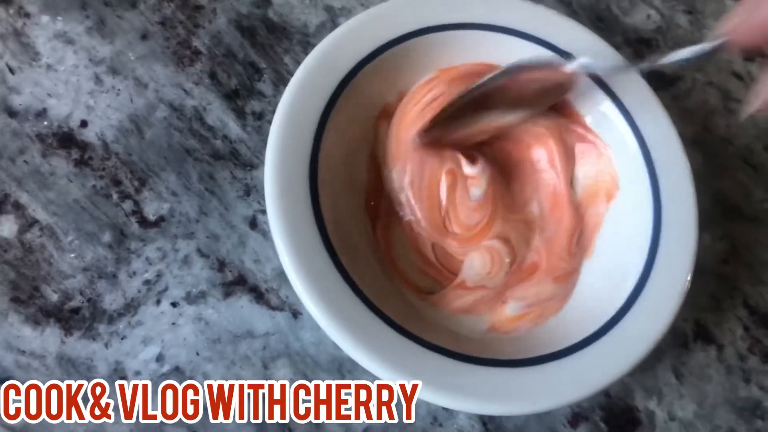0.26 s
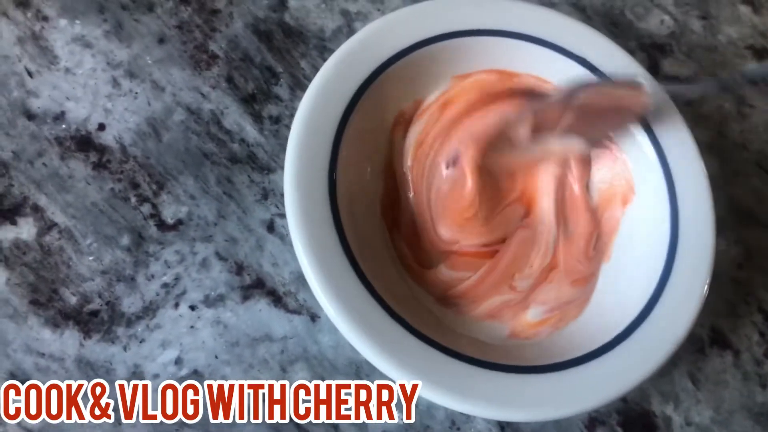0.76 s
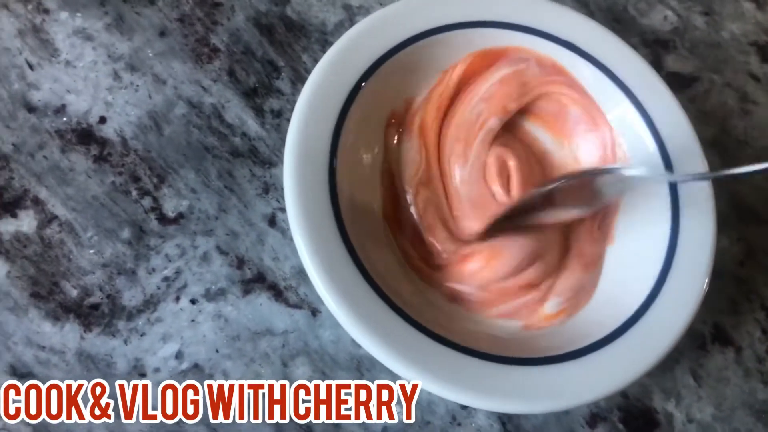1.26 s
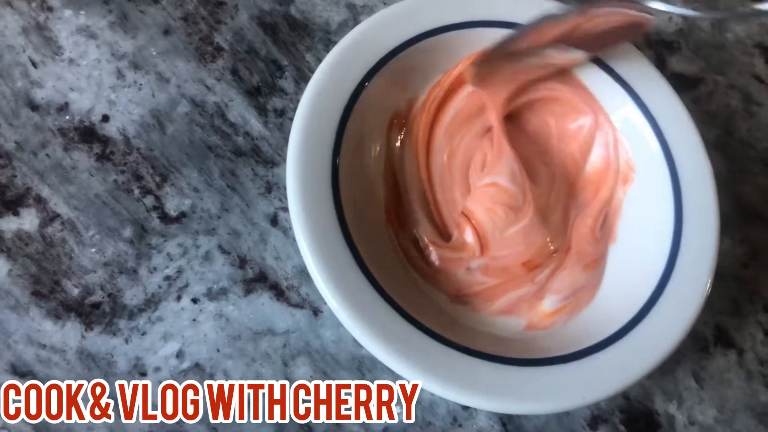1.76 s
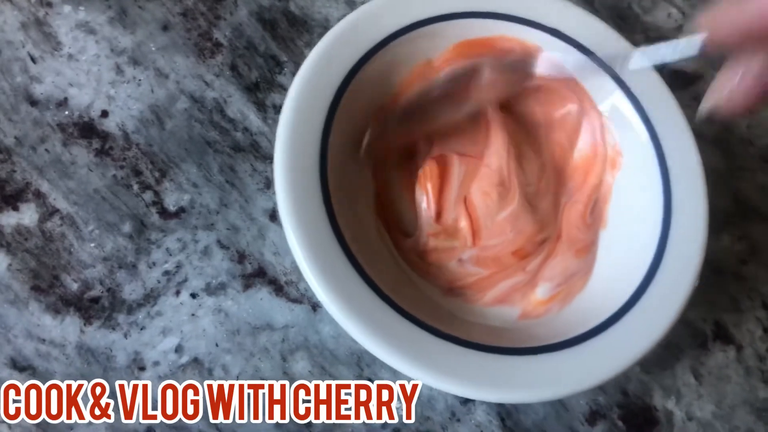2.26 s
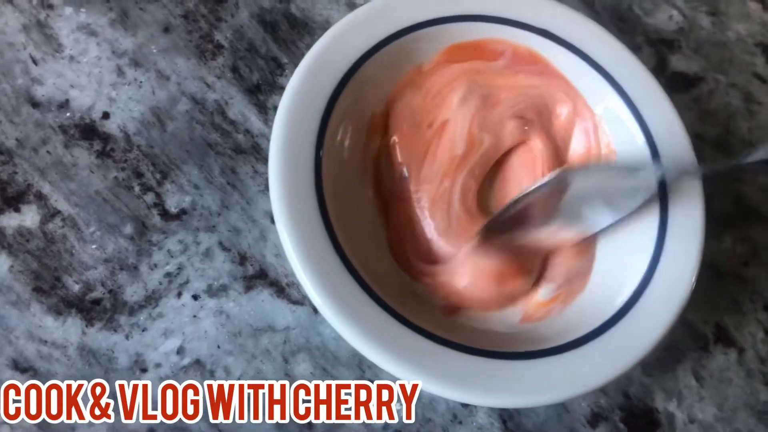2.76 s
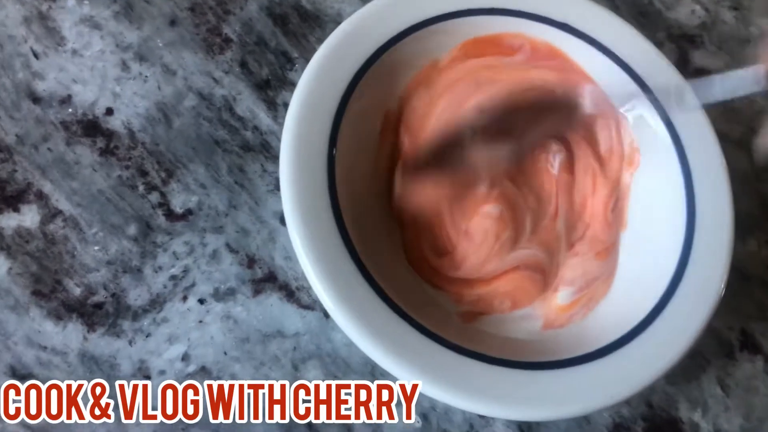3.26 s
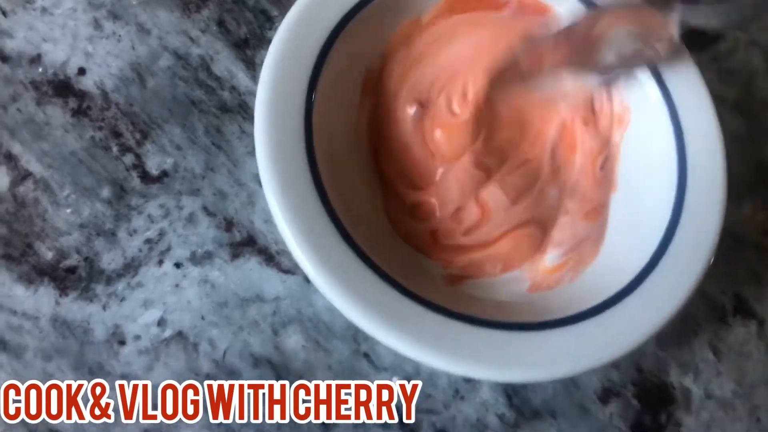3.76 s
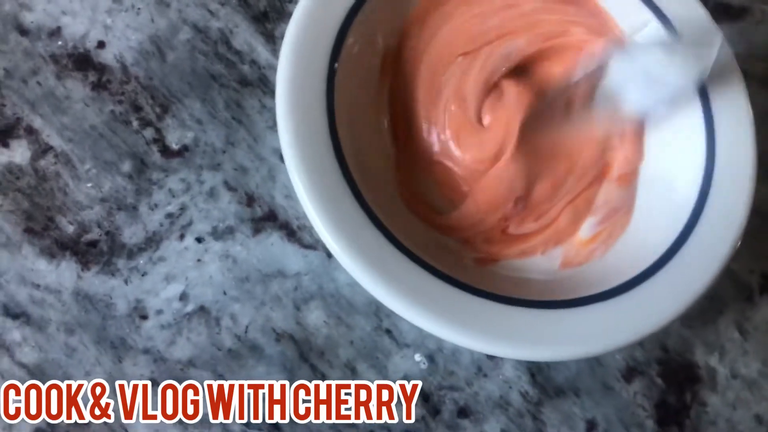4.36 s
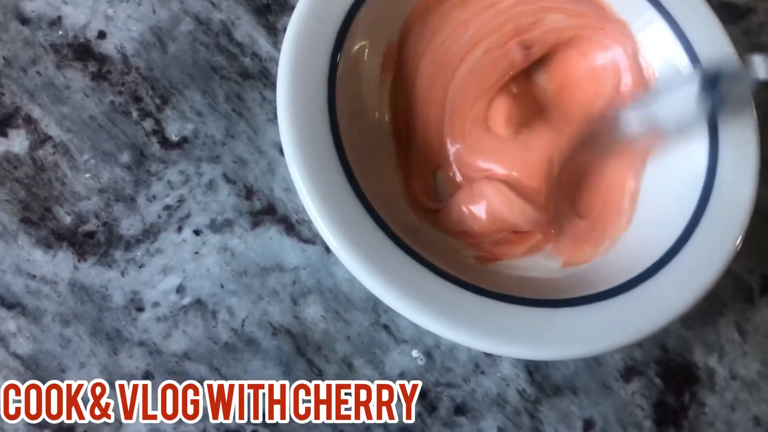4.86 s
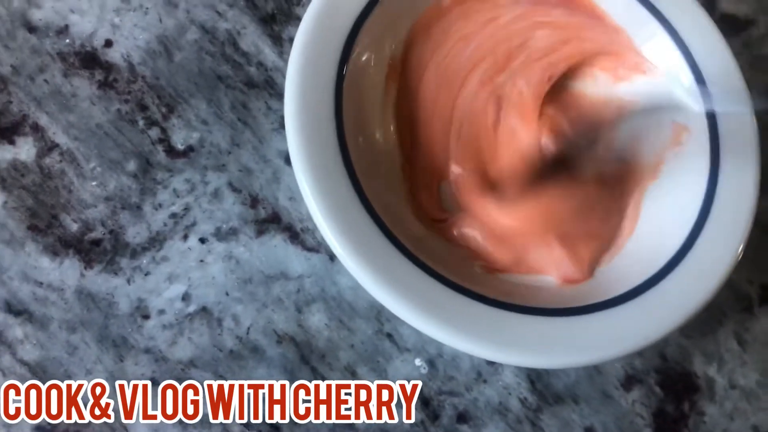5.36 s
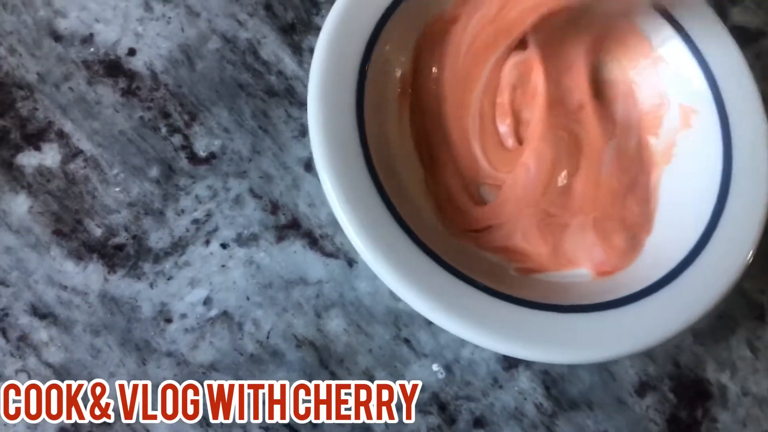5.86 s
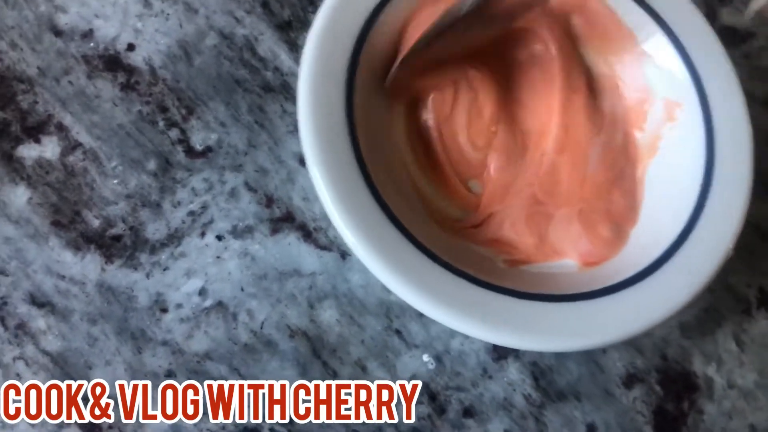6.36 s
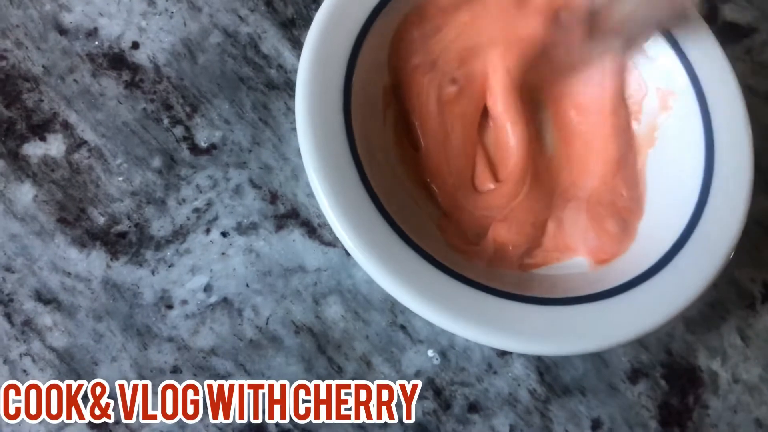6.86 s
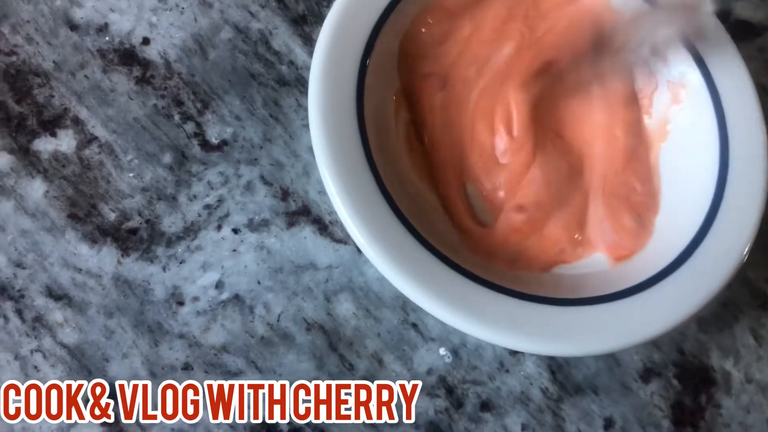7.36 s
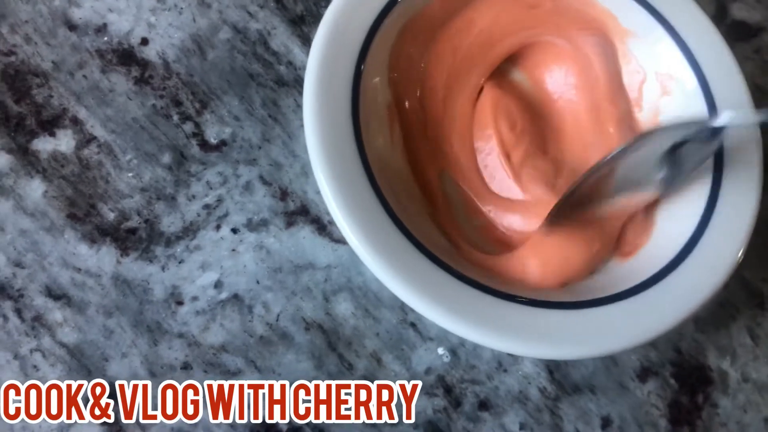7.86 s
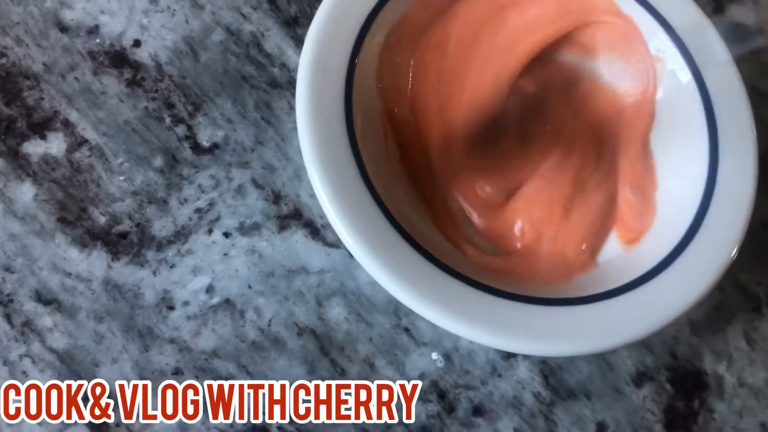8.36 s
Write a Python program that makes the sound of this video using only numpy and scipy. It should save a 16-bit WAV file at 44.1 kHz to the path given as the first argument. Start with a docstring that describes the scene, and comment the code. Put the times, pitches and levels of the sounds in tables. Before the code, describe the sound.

In a small kitchen with a faint hum, a metal spoon circles through sticky sauce in a ceramic bowl, heard close up. Gritty rubbing and wet swishes repeat in a quick rhythm, dotted with ticks and briefly ringing clinks. Two sharper strikes stand out just past halfway, then the strokes become denser and slightly squeakier, continuing to the end.

```python
"""A steel spoon stirs thick sauce in a ceramic bowl on a stone counter, heard close up.
It drags over the glaze in dense tiny slips and clinks against the wall. About three times a second it
pushes through the sauce (a rubbing swell that chirps when hard) and skims the thinly coated wall
(a hiss). The sauce crackles and damps the bowl to a short ring. Two faint, soft blips sound early on.
A small kitchen hums and reverberates."""
import sys
import numpy as np
from scipy import signal
from scipy.fft import rfft, irfft, next_fast_len
from scipy.io import wavfile
from scipy.ndimage import uniform_filter1d, minimum_filter1d, map_coordinates

SR = 44100
rng = np.random.default_rng(int(sys.argv[2]) if len(sys.argv) > 2 else 0)


def bounce(signal):
    """Save signal as a 16-bit WAV file at the path given by the first command-line argument."""
    frames = np.transpose(np.atleast_2d(signal))
    limited = np.clip(frames, -1, 1)
    pcm = np.round(limited * 32767).astype(np.int16)
    wavfile.write(sys.argv[1], SR, pcm)


N = 380141

# Ringing modes of the bowl. Each row: frequency in Hz, struck level in dB, share of a clink's ring dB,
# t60 under the spoon in seconds, free t60 in seconds, coupling to rubbing in dB.
BOWL_MODES = [(2697, .5, .25, .06, .25, -50.5), (3793, -25, .25, .06, .2, -66),
              (6267, 7, 1, .11, .25, -56.5), (10795, 4, 1, .08, .14, -49)]
# Heavily damped resonances of spoon and bowl. Each row: frequency in Hz, spectral density in dB.
CLACK_SPECTRUM = [(150, -44), (350, -26), (720, -16), (900, -24), (1080, -5), (1250, -5.5), (1600, -4.5),
                  (2050, -3.5), (2350, 1.5), (3300, 2), (4400, -3.5), (5400, -10.5), (6600, -3),
                  (8300, -11.5), (9000, -9), (10000, -20.5), (11500, -15), (12900, -35), (13800, -19.5),
                  (16000, -27.5)]
# Spoon strikes bowl. Each row: start in seconds, clack level in dB, then offsets from it in dB for
# low knock, bright tick and ring (the last scaled by each mode's share).
CLINKS = [(0.1139, -42.5, -1, -12, -47), (0.1346, -26, -7.5, -5.5, -53), (0.2053, -47.5, 10, -10, -32),
          (0.3207, -40, -1.5, -8.5, -24), (0.8676, -37.5, 0, -6, -37), (1.273, -64, 0, 9, -23),
          (1.305, -46, 4.5, -16, -24), (1.311, -26.5, -8, -1.5, -22), (1.3694, -33.5, -1.5, -7, -36),
          (1.7462, -30.5, -2.5, 0, -4.5), (2.091, -41, -2, 1, -12.5), (2.3679, -23, -4, -6, -12),
          (2.5946, -19.5, -3, -4.5, -20), (2.839, -20.5, -3, -7, -23.5), (3.7503, -49, 4, -18, -27),
          (4.3188, -42, 7.5, -12.5, -35), (4.489, -39.5, -19, -5.5, -24), (4.7228, -14, -13, -8, -10.5),
          (4.9971, -17.5, -8, -10, -8.5), (5.3665, -26, -8.5, -4, -17.5), (5.4261, -37.5, -0.5, -13, -17),
          (5.8053, -58, -11, 9.5, -30), (5.8318, -48, -3.5, -1.5, -3.5), (5.942, -52.5, -6, 3, -1),
          (6.2599, -28.5, 0, 7.5, -16), (6.4538, -36, -3, -3, -53), (6.5559, -38.5, 1, -7, -38),
          (6.637, -34.5, -7, -16, -8.5), (6.6863, -29, -4.5, -11, -19), (7.1338, -46, 13, -19, -15),
          (7.171, -36.5, -3, -12, -15), (7.296, -40, 3, -12, -40), (7.679, -33, -4, -14, -24),
          (7.703, -38, 2.5, -9, -30), (7.7596, -30, -4, -6, -15), (7.8098, -33, -3.5, -8.5, -18),
          (7.9525, -41.5, -3, -6.5, -41)]
# Spoon pushes through sauce. Each row: middle in seconds, length in seconds, level in dB, glide in Hz.
PUSHES = [(0.251, 0.072, -38.5, -700), (0.794, .06, -41.5, -5), (1.136, 0.087, -37, -650),
          (1.457, 0.087, -37, -300), (2.247, 0.078, -43.5, -200), (2.464, .06, -41, -300),
          (2.9, 0.11, -41, 0), (3.206, .11, -37, -100), (3.57, 0.068, -41, 103),
          (3.852, 0.095, -34.5, -220), (4.189, .12, -33, -430), (4.448, 0.19, -38, 182),
          (5.192, 0.044, -34, 60), (5.246, 0.072, -40.5, -8), (5.63, 0.12, -36.5, -100),
          (6.023, 0.09, -42.5, 5), (6.365, .12, -40, -100), (6.629, .11, -34, 850), (6.761, 0.13, -44.5, 3),
          (6.883, 0.16, -35.5, -150), (7.027, 0.076, -33.5, 30), (7.13, 0.068, -33.5, 242),
          (7.172, 0.085, -34, -100), (7.308, 0.093, -39.5, 0), (7.435, 0.13, -33.5, 353),
          (7.573, 0.066, -39, 0), (7.688, 0.15, -36.5, 206), (7.868, .08, -35.5, 70),
          (8.013, 0.13, -30.5, -110), (8.122, 0.09, -38.5, 37), (8.284, 0.17, -34, 219),
          (8.444, 0.066, -34, -120), (8.564, .12, -32.5, 650)]


def amp(db):
    """Decibels to gain."""
    return 10 ** (np.asarray(db) / 20)


def unit(x):
    """Scale to rms 1."""
    return x / np.sqrt(np.mean(x ** 2) + 1e-20)


def along(points, hz):
    """Interpolate (Hz, value) points on a log frequency axis."""
    knots_hz, values = np.transpose(points)
    return np.interp(np.log(hz + 1), np.log(knots_hz + 1), values)


def wobble(knots_per_s, size=N):
    """Smooth random curve."""
    knots = rng.standard_normal(int(size * knots_per_s / SR) + 4)
    return map_coordinates(knots, [np.arange(size) * knots_per_s / SR])


def filtered(x, response):
    """Zero-phase filter with gain response(hz)."""
    size = next_fast_len(N + SR // 2)
    return irfft(rfft(x, size) * response(np.fft.rfftfreq(size, 1 / SR)), size)[:N]


def coloured(x, spectrum):
    """Filter by (Hz, dB) points; rms 1."""
    return unit(filtered(x, lambda hz: amp(along(spectrum, hz))))


def minimum_phase(spectrum, size):
    """Shortest causal impulse response with the given spectrum."""
    cepstrum = irfft(np.log(amp(along(spectrum, np.fft.rfftfreq(size, 1 / SR)))), size)
    cepstrum[1:size // 2] *= 2
    cepstrum[size // 2 + 1:] = 0
    return irfft(np.exp(rfft(cepstrum)), size)


def even(x, window_s=0.048):
    """Keep fine roughness, remove slow swells."""
    size = int(window_s * SR)
    power = uniform_filter1d(uniform_filter1d(x ** 2, size), size)
    return unit(x / np.sqrt(np.abs(power) + 1e-6))


def add(track, start_s, sound):
    """Mix a sound into the track, starting no earlier than 0 s."""
    start = max(round(start_s * SR), 0)
    track[start:start + len(sound)] += sound[:max(N - start, 0)]


def contact(land_s=0.019, lift_s=0.028):
    """Spoon on the bowl: gain of the plain drag, and a gate that is 1 while touching."""
    # Each row: landing in seconds, lift-off in seconds, drag level in dB.
    contacts = [(0, .065, -47), (0.127, 0.28, -45), (0.303, 0.803, -47.5), (0.868, .96, -47),
                (0.978, 1.165, -46), (1.364, 1.484, -47), (1.81, 1.951, -50.5), (2.125, 2.243, -55.5),
                (2.384, 2.5, -56.5), (2.585, 2.753, -45), (2.822, 4.534, -47.5), (4.74, 4.823, -49.5),
                (5.01, 5.268, -50), (5.42, 5.45, -46), (5.481, 5.68, -46.5), (5.858, 6.12, -51),
                (6.287, 6.4, -49), (6.549, 7.725, -46.5), (7.74, 7.916, -45.5), (7.945, 8.6, -45.5)]
    t = np.arange(N) / SR
    drag, touching = np.zeros(N), np.zeros(N)
    for start_s, end_s, db in contacts:
        gate = np.clip(np.minimum((t - start_s) / land_s, (end_s - t) / lift_s + .5), 0, 1)
        drag += amp(db) * gate
        touching += gate
    return drag, touching


def slips(per_s, spread_db, smooth_gain, smear_t60_s):
    """Tiny uneven stick-slip releases over smooth friction, each smeared by the bowl's body."""
    sizes = amp(spread_db * np.clip(rng.standard_normal(N), -3, 2.5)) * rng.choice([-1, 1], N)
    releases = unit(sizes * (rng.random(N) < per_s / SR))
    t = np.arange(SR // 30) / SR
    energy = np.abs(signal.fftconvolve(releases ** 2, amp(-120 * t / smear_t60_s))[:N])
    return unit((unit(np.sqrt(energy)) + smooth_gain) * rng.standard_normal(N))


def shifting_resonances(x, depth_db, width_hz, life_s):
    """The moving contact point favours ever-changing resonances."""
    spectra = signal.stft(x, nperseg=512)[2]
    rows = np.arange(spectra.shape[0]) * SR / 512 / width_hz
    cols = np.arange(spectra.shape[1]) * 256 / SR / life_s
    grid = np.meshgrid(rows, cols, indexing="ij")
    field = map_coordinates(rng.standard_normal((256, 1100)), grid, order=1)
    spectra *= amp(depth_db * np.clip(field, -2, 1.4))
    return unit(signal.istft(spectra, nperseg=512)[1][:N])


def scraping(drag_hiss_db=-14.5):
    """Slips under an unsteady hand drive spoon and bowl; bare glaze is thinner and brighter."""
    # Friction spectra. Each row: frequency in Hz, spectral density in dB.
    rub_spectrum = [(300, -26), (850, -27), (1090, -5), (1300, 3), (1500, 8), (1780, -9.5), (2020, 2),
                    (2250, 4.5), (2550, -15.5), (3000, -18.5), (4500, -48)]
    rasp_spectrum = [(1800, -36), (2700, 5), (3050, -2.5), (3350, -5), (3650, -5), (4200, -4), (4700, -13),
                     (5400, -15.5), (6400, -7), (7500, -19.5)]
    coated_spectrum = [(3000, -51.5), (4200, -4.5), (5100, -51), (6400, 11.5), (6850, -4.5), (7500, 17.5),
                       (8400, -22.5), (9100, 4.5), (10100, -17.5), (11550, 5.5), (12900, -34),
                       (14000, -34.5), (16000, -25.5)]
    glaze_spectrum = [(5100, -16.5), (6270, 0.5), (6850, -32.5), (7750, 9.5), (8650, -24.5), (9200, -4),
                      (10200, -26), (11600, 5.5), (13000, -37), (14000, -23.5), (16000, -30.5)]
    bare = bare_glaze()
    drag, touching = contact()
    rub_gain = np.hypot(drag * amp(.9 * wobble(14)), pushing())
    hiss_gain = np.hypot(drag * amp(drag_hiss_db + 1.3 * wobble(10)), touching * skimming(bare))
    friction = slips(per_s=1300, spread_db=4.5, smooth_gain=0.6, smear_t60_s=0.011)
    friction *= amp(2.9 * wobble(60)) * lift_before_clinks()
    friction = shifting_resonances(friction, depth_db=6.5, width_hz=334, life_s=.03)
    rub = rub_gain * amp(-0.13 + 2.1 * wobble(45)) * even(coloured(friction, rub_spectrum))
    rasp_gain = np.sqrt(rub_gain * hiss_gain) * amp(-1.83 - 6.8 * bare + 1.9 * wobble(30))
    rasp = rasp_gain * even(coloured(friction, rasp_spectrum))
    coated = (1 - bare) * even(coloured(friction, coated_spectrum))
    glaze = amp(2.5) * bare * even(coloured(friction, glaze_spectrum))
    hiss = hiss_gain * amp(-1.0 + 0.53 * wobble(38)) * (coated + glaze)
    return rub + rasp + hiss


def bowl_ring(rubbing):
    """Rubbing keeps the bowl's modes ringing, most on bare glaze; they linger when the spoon lifts."""
    t = np.arange(SR // 2) / SR
    modes = [amp(db - 60 * t / t60_s) * np.sin(2 * np.pi * hz * t) for hz, *_, t60_s, db in BOWL_MODES]
    return signal.fftconvolve(rubbing * amp(14 * bare_glaze()), sum(modes))[:N]


def crackles(per_s=36, spread_db=3, t60_s=0.0093):
    """Sticky sauce snaps behind the spoon; each snap is a noise spurt through the damped resonances."""
    drag, _ = contact()
    sizes = amp(spread_db * np.minimum(rng.exponential(size=N), 3))
    snaps = sizes * (rng.random(N) < per_s / SR) * np.hypot(drag, .6 * pushing())
    t = np.arange(SR // 50) / SR
    envelope = signal.fftconvolve(snaps, amp(-60 * t / t60_s))[:N]
    rms = amp(-2) * np.sqrt(np.mean(envelope ** 2))
    return rms * coloured(envelope * rng.standard_normal(N), CLACK_SPECTRUM)


def narrow_swell(length_s, start_hz, end_hz, width_hz):
    """A noisy resonance that glides while it swells and fades."""
    size = int(length_s * SR)
    phase = 2 * np.pi * np.cumsum(np.linspace(start_hz, end_hz, size)) / SR
    tone = wobble(width_hz, size) * np.cos(phase) + wobble(width_hz, size) * np.sin(phase)
    window = np.hanning(size)
    return unit(tone * window) * np.sqrt(np.mean(window ** 2))


def soft_blips():
    """Two faint, soft blips near 800 Hz, one right at the start."""
    # Each row: middle in seconds, length in seconds, level in dB, frequency in Hz.
    blips = [(.02, 0.067, -51, 812), (1.642, 0.0226, -52.5, 800)]
    out = np.zeros(N)
    for middle_s, length_s, db, hz in blips:
        add(out, middle_s - length_s / 2, amp(db) * narrow_swell(length_s, hz, hz, width_hz=330))
    return out


def kitchen(hum_hz=107.3):
    """Room air, an appliance's hum and a low rumble."""
    # Each row: frequency in Hz, spectral density in dB.
    air_spectrum = [(25, -30), (50, -15), (120, -0.5), (160, -16), (210, -2.5), (400, -5), (720, -12.5),
                    (1070, -18.5), (2550, -25), (8000, -36), (10000, -29.5), (12500, -46.5), (15000, -29),
                    (16000, -62)]
    rumble_spectrum = [(20, -36), (45, -14), (65, -9), (130, -26.5), (600, -76)]
    # Each row: time in seconds, level in dB.
    rumble_levels = [(0, -63), (2.5, -67.5), (2.85, -60.5), (3.3, -59), (3.8, -63.5), (5, -68.5),
                     (8.62, -63)]
    t = np.arange(N) / SR
    air = amp(-59.0) * coloured(rng.standard_normal(N), air_spectrum)
    hum = amp(-65 + 1.3 * wobble(3.7)) * np.sin(2 * np.pi * hum_hz * t + .5 * wobble(2.8))
    rumble_db = np.interp(t, *np.transpose(rumble_levels))
    rumble = amp(rumble_db) * coloured(rng.standard_normal(N), rumble_spectrum)
    return air + hum + rumble


def reverb(x, predelay_s=0.0056):
    """Wall reflections: each frequency dies at its own rate."""
    # Each row: frequency in Hz, t60 in seconds.
    wall_decay = [(200, 0.58), (2000, 0.31), (6000, 0.44), (14000, 0.17)]
    wet_hz_db = [(700, -8.0), (1600, -11.5), (4000, -22.5), (10000, -24.5)]
    bins_hz, t, spectra = signal.stft(rng.standard_normal(SR // 2), SR, nperseg=256)
    decay = amp(-60 * t / along(wall_decay, bins_hz)[:, None])
    tail = signal.istft(spectra * decay, SR, nperseg=256)[1]
    response = np.r_[np.zeros(round(predelay_s * SR)), tail / np.linalg.norm(tail)]
    wet = signal.fftconvolve(x, response)[:N]
    return filtered(wet, lambda hz: amp(along(wet_hz_db, hz)))


def lift_before_clinks(dip_db=-10, lift_s=.022):
    """Friction gain: the spoon leaves the glaze just before it strikes."""
    gap = np.zeros(N)
    for strike_s, *_ in CLINKS:
        add(gap, strike_s - lift_s, np.sqrt(np.linspace(0, 1, int(lift_s * SR))))
    return amp(dip_db * gap)


def blow(t, crack_db, crack_t60_s, chatter_db, chatter_t60_s):
    """One contact: a sharp crack and brief edge chatter through the damped resonances."""
    envelope = amp(-60 * t / crack_t60_s) + amp(chatter_db - 60 * t / chatter_t60_s)
    force = rng.standard_normal(len(t)) * envelope
    force[0] = amp(crack_db) * np.linalg.norm(force)
    return signal.fftconvolve(force, minimum_phase(CLACK_SPECTRUM, size=2048))[:len(t)]


def clinks(thud_rise_s=0.00093, free_ring_db=-12.5):
    """The spoon strikes the wall and chokes the first ring; a weaker free ring lingers."""
    # Bowl thuds on the counter. Each row: frequency in Hz, level in dB re the knock, t60 in seconds.
    thud_modes = [(554, -17, 0.06), (757, -8.5, 0.041)]
    knock_clack_tick_hz = [(520, 2000), (2100, 5500), (5800, 13500)]
    bands = [signal.butter(3, edges, "band", fs=SR, output="sos") for edges in knock_clack_tick_hz]
    out, t = np.zeros(N), np.arange(SR // 2) / SR
    for start_s, db, knock_db, tick_db, ring_db in CLINKS:
        clack = blow(t[:SR // 10], crack_db=-1.5, crack_t60_s=.015, chatter_db=-17, chatter_t60_s=.055)
        for band, band_db in zip(bands, [db + knock_db, db, db + tick_db]):
            part = signal.sosfilt(band, clack)
            add(out, start_s, amp(band_db) * part / np.std(part[:SR // 100]))  # level of first 10 ms
        for hz, thud_db, t60_s in thud_modes:
            envelope = amp(db + knock_db + thud_db - 60 * t / t60_s) * (1 - np.exp(-t / thud_rise_s))
            add(out, start_s, envelope * np.sin(2 * np.pi * hz * t))
        for hz, mode_db, share, held_t60_s, free_t60_s, _ in BOWL_MODES:
            gain = amp(db + mode_db + share * ring_db + rng.standard_normal())
            decay = amp(-60 * t / held_t60_s) + amp(free_ring_db - 60 * t / free_t60_s)
            add(out, start_s, gain * decay * np.sin(2 * np.pi * hz * t))
    return out


def chirp_share(db, midpoint_db=-39, range_db=3):
    """Crossfade from rub (0) to chirp (1): harder pushes chirp more."""
    return .5 + .5 * np.tanh(.5 * (db - midpoint_db) / range_db)


def pushing():
    """Rub gain: one smooth swell per push through the sauce."""
    out = np.zeros(N)
    for middle_s, length_s, db, _ in PUSHES:
        gain = amp(db) * np.sqrt(1 - chirp_share(db))
        add(out, middle_s - length_s / 2, gain * np.hanning(int(length_s * SR)))
    return out


def chirps(low_hz=2190, upper_ratio=1.48):
    """Two spoon resonances slide as the contact travels along its edge, inside a broad rasp."""
    out = np.zeros(N)
    for middle_s, length_s, db, glide_hz in PUSHES:
        start_hz, end_hz = low_hz + max(-glide_hz, 0), low_hz + max(glide_hz, 0)
        main = narrow_swell(length_s, start_hz, end_hz, width_hz=210)
        upper = narrow_swell(length_s, upper_ratio * start_hz, upper_ratio * end_hz, width_hz=650)
        rasp = narrow_swell(length_s, start_hz, end_hz, width_hz=900)
        gain = amp(db - 1.85) * np.sqrt(chirp_share(db))
        add(out, middle_s - length_s / 2, gain * (main + amp(-16) * upper + amp(-12) * rasp))
    return out


def skimming(bare, rise_s=0.039, fall_s=0.02, bare_stretch=1.88):
    """Hiss gain: each skim of the wall builds slowly, ends fast and lasts longer on bare glaze."""
    # Each row: peak in seconds, level in dB.
    skims = [(.24, -69), (0.403, -46.5), (0.678, -49.5), (.925, -53), (1.445, -56), (1.883, -44.5),
             (2.238, -43), (2.46, -47), (2.735, -48), (3.04, -50.5), (3.385, -45.5), (3.53, -53.5),
             (3.678, -48.5), (3.991, -42.5), (4.19, -50), (4.315, -49), (4.77, -62), (5.109, -47),
             (5.999, -45), (6.355, -46.5), (6.647, -45.5), (6.78, -49), (6.91, -46), (7.048, -45),
             (7.17, -48), (7.289, -41.5), (7.417, -43.5), (7.54, -47.5), (7.595, -45.5), (7.695, -43.5),
             (7.84, -45.5), (7.905, -44), (8.141, -46.5), (8.29, -57), (8.432, -44), (8.586, -47)]
    out, t = np.zeros(N), np.arange(SR) / SR - .5
    for peak_s, db in skims:
        width_s = np.where(t < 0, rise_s, fall_s) * bare_stretch ** bare[int(peak_s * SR)]
        swell = amp(db) * np.exp(-(t / width_s) ** 2)
        add(out, peak_s - .5, swell[t >= -peak_s])
    return out


def smacks(hz=4050, width_hz=540, re_skim_db=-5.5):
    """Sauce squeezed thin under the skimming edge gives a narrow wet resonance."""
    bare = bare_glaze()
    _, touching = contact()
    phase = 2 * np.pi * hz * np.arange(N) / SR
    tone = unit(wobble(width_hz) * np.cos(phase) + wobble(width_hz) * np.sin(phase))
    return amp(re_skim_db) * (1 - bare) * touching * skimming(bare) * tone


def bare_glaze():
    """1 while the spoon's edge is above the sauce, 0 while in it."""
    # Each row: start in seconds, end in seconds.
    bare_spans = [(1.76, 1.88), (2.1, 2.24), (5.02, 5.15), (5.82, 6.33)]
    t = np.arange(N) / SR
    gate = sum(1. * ((t > start_s) & (t < end_s)) for start_s, end_s in bare_spans)
    return uniform_filter1d(gate, SR // 50)


def scene():
    """Spoon, bowl and sauce in the kitchen; mono."""
    rubbing = scraping() + chirps() + smacks()
    background = kitchen()
    stirring = clinks() + rubbing + bowl_ring(rubbing) + soft_blips() + crackles()
    return (stirring + reverb(stirring) + background)[None]


def record(dry):
    """Peak limiter, then a steep low-pass."""
    ceiling, cutoff_hz = .88, 16000
    needed_gain = np.minimum(1, ceiling / (np.abs(dry[0]) + 1e-9))
    gain = uniform_filter1d(minimum_filter1d(needed_gain, size=65), size=65)
    return filtered(dry[0] * gain, lambda hz: 1 / np.sqrt(1 + (hz / cutoff_hz) ** 160))[None]


dry = scene()
out = record(dry)
bounce(out)
```